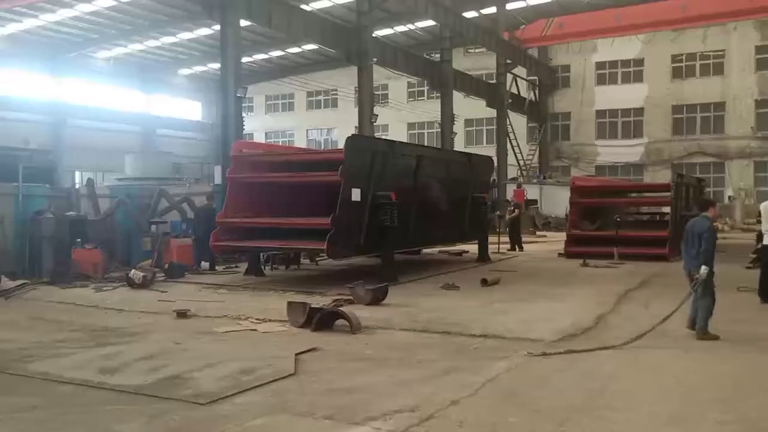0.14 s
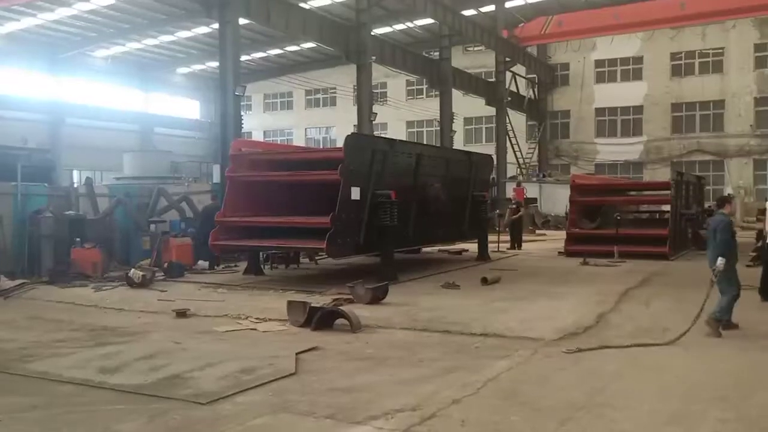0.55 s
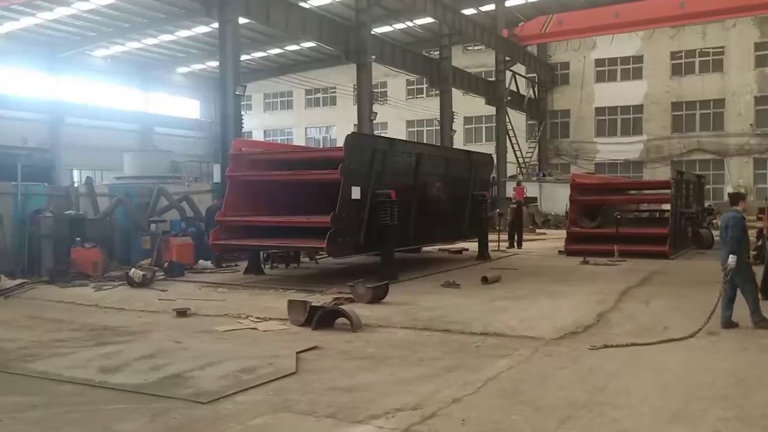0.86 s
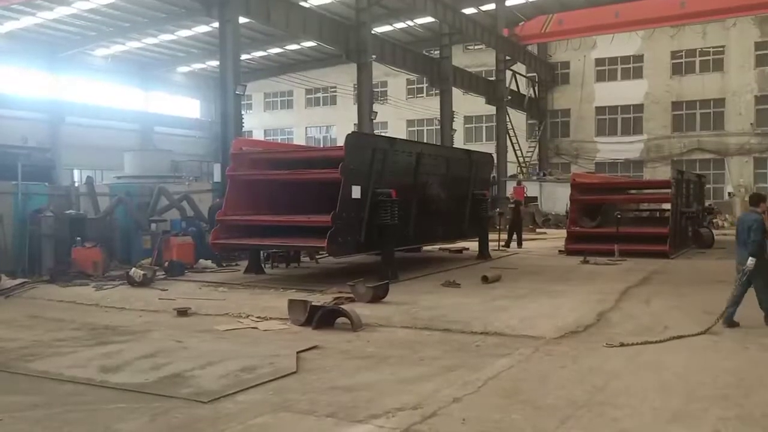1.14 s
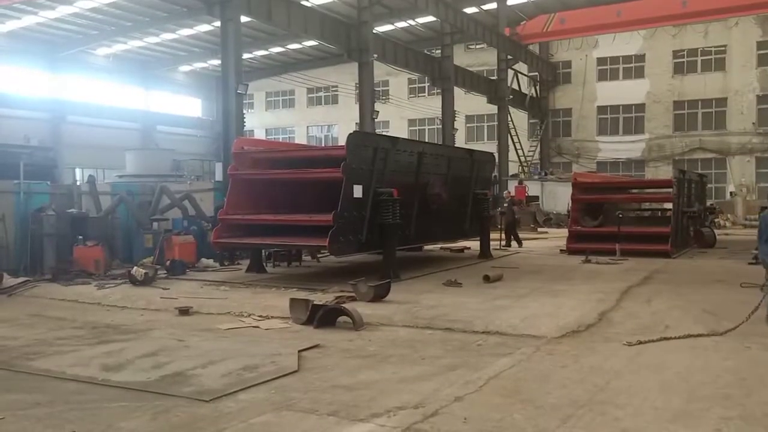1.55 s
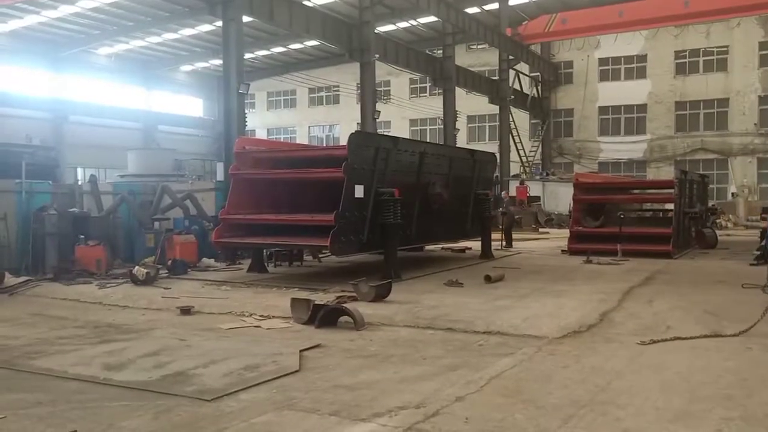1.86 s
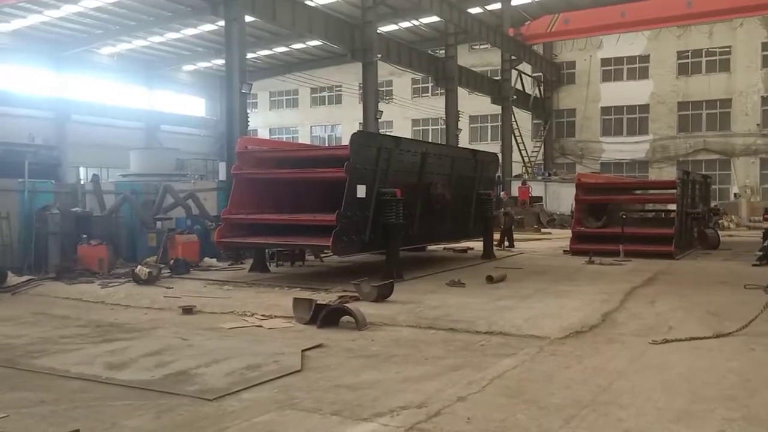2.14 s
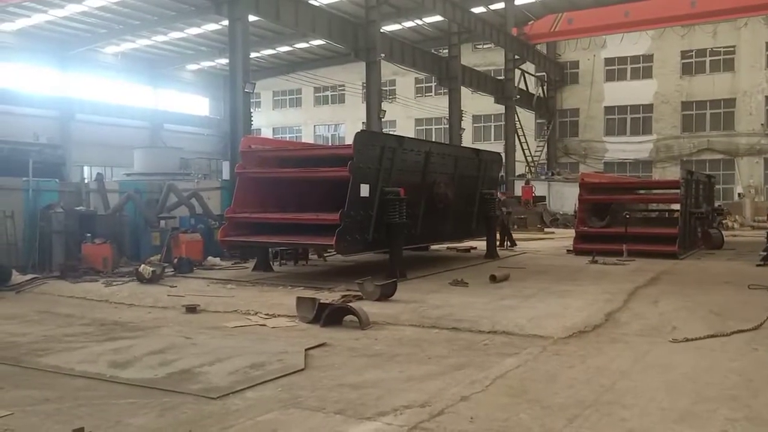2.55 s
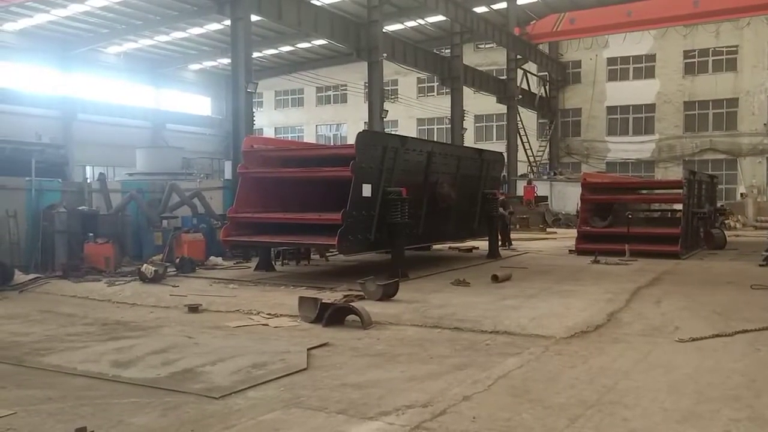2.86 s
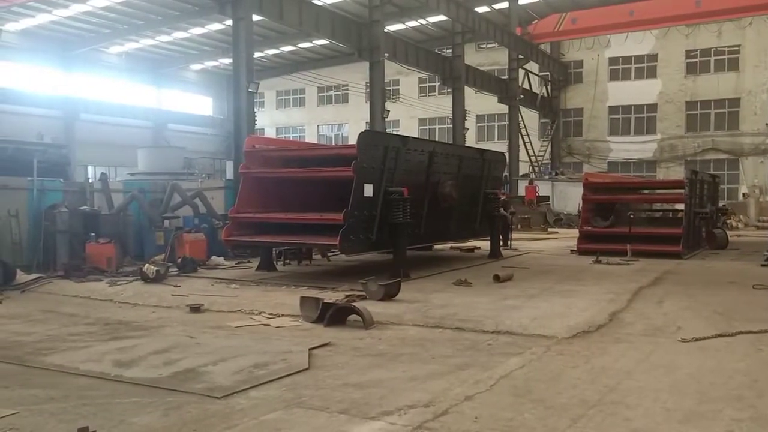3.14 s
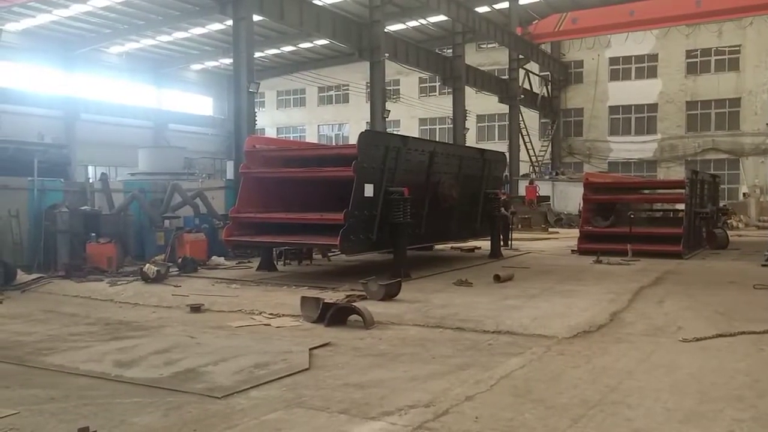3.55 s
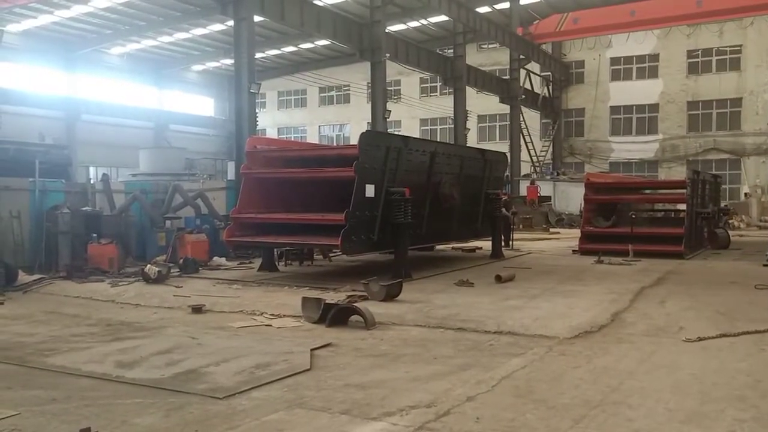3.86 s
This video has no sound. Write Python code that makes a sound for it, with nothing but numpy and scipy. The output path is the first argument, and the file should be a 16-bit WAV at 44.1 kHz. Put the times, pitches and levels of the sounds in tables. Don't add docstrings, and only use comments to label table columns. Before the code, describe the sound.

Large vibrating screen machine thumps and rattles steadily over a roar, distant hammering ringing in the hall

```python
import sys
import numpy as np
from scipy import signal
from scipy.fft import rfft, irfft
from scipy.io import wavfile
from scipy.ndimage import uniform_filter1d

SR = 44100
rng = np.random.default_rng(int(sys.argv[2]) if len(sys.argv) > 2 else 0)


def decibels_to_gain(level_db):
    exponent = np.asarray(level_db, float) / 20
    return 10 ** exponent


def transcribe(u):
    v = np.clip(np.atleast_2d(u).T, -1, 1)
    q = np.round(v * 32767).astype(np.int16)
    wavfile.write(sys.argv[1], SR, q)


N = 176400
SHAFT_HZ = 16.65

# t/s, level/dB, treble level/dB, hardest rung mode f/Hz
HAMMER_BLOWS = [(.02, -33.5, -4, 2300), (.347, -22, 0, 1513), (.69, -25.5, 1, 1910), (.99, -26, -2, 2520),
                (1.255, -24.5, -1.5, 2053), (1.555, -26.5, 2, 2053), (1.84, -26.5, 3, 2420),
                (2.17, -28.5, 3.5, 2283), (2.805, -26, 2.5, 2250), (3.17, -23, 0.5, 2750),
                (3.495, -25.5, 3.5, 2940), (3.805, -25, 1, 2460)]
# f/Hz, level/dB
PLATE_COLOUR = [(700, -7), (1200, -10), (1500, -4.5), (2200, -2.5), (2900, -3.5), (3600, -11),
                (8500, -18.5), (11500, -22.5)]
# f/Hz, level over the plate colour/dB
PLATE_MODES = [(1502, 3), (1653, 0), (1780, 1), (1846, 2), (1935, 1), (2013, 2), (2283, 1), (2471, 2),
               (2632, 0), (2775, 1), (2880, 4), (3135, 1), (4320, 2), (4530, 2)]
# lowest f/Hz, highest f/Hz
STRAY_RANGE = (1350, 3300)
# t/s, level/dB, centre f/Hz
WALL_CLANKS = [(0.414, -35, 3640), (.49, -42, 4640), (.81, -36, 3500), (1.052, -41.5, 4100),
               (1.13, -36, 2200), (1.33, -32, 1700), (1.38, -36.5, 3230), (1.60, -38, 7000),
               (1.996, -38.5, 6500), (2.195, -41.5, 6900), (2.278, -39.5, 4240), (2.39, -39.5, 4460),
               (2.471, -45.5, 5000), (2.55, -38, 1740), (2.901, -40, 4560), (3.261, -39, 3560),
               (3.411, -34, 2700), (3.70, -36, 2720), (3.89, -39, 4170)]
# f/Hz, level/dB
ROAR_COLOUR = [(90, -15.5), (200, -5.5), (450, -13.5), (540, -6.5), (690, -5.5), (860, -10), (1200, -15.5),
               (2200, -11.5)]
# t/s, roar level/dB, level of all shaft orders/dB
DECK_LOAD = [(.3, 0, 1), (.55, -4.5, 1.5), (.8, -1, 1), (1, 0, 0), (1.3, -2, 0), (1.6, -1, -2),
             (1.9, 0.5, 0), (2.2, 1, -1), (2.5, -1.5, -1.5), (2.7, -1, 0), (2.9, 2.5, 1.5), (3.1, 2, 1),
             (3.3, 0.5, 1.5), (3.6, -1, 0), (3.8, 1, 0), (4, -0.5, 0.5)]
# multiple of the shaft rate
# [1], level/dB
SHAFT_ORDERS = [(4, -28), (5, -20), (6, -3), (7, -7), (8, -10), (9, -1), (10, -1), (11, -1), (12, 1),
                (13, 0), (14, -6), (15, -3), (16, -15), (17, -18), (18, -4), (19, -4), (20, -13), (21, -5),
                (22, -6), (23, -9), (24, -6),
                (25, -18), (26, -11), (27, -17), (28, -15), (30, -20), (31, -8), (32, -12), (33, -12),
                 (34, -5), (35, -16), (36, -11), (37, -7), (38, -8), (40, -11), (42, -12), (43, -19),
                 (44, -15), (45, -18), (46, -19), (47, -18), (58, -20), (59, -20)]
# f/Hz, level/dB
MIC_RESPONSE = [(30, -12.5), (55, -16.5), (85, 1), (8800, 1), (9700, -1.5), (10600, -3), (11500, -2)]
# f/Hz, share of the time [0-1]
DROPOUT_SHARE = [(3000, 0), (4000, .015), (7200, .04), (7700, .18), (8600, .22), (9400, .22), (9800, .68),
                 (10300, .74), (10700, .84), (11000, .74), (11300, .36), (11700, .42), (11900, .8)]
# from t/s, to t/s, level above the knee/dB, level below it/dB
TREBLE_SPELLS = [(.27, .36, 3, 2), (.37, .47, -3, -3), (.60, .66, 3, 0), (.79, .93, -1, -3),
                 (.98, 1.02, 5, 2), (1.04, 1.19, -4, -3), (1.22, 1.29, 12, 3), (1.30, 1.47, -1, -3),
                 (1.48, 1.63, 12, 3), (1.63, 2.24, 0, 3), (2.25, 2.40, -4, -3), (2.40, 2.51, -4, 1),
                 (2.52, 2.84, 2, 3), (2.87, 3.09, -6, 2), (3.10, 3.17, 12, 2), (3.43, 3.48, 6, 2),
                 (3.52, 3.71, -5, 1), (3.83, 3.89, -5, -3), (3.90, 3.93, 5, 2), (3.94, 4, -4, -1)]
# f/Hz, share [0-1]
SPELL_REACH = [(6000, .2), (7600, 1), (11000, 1), (11250, .2)]


def colour(x, points):
    hz, db = np.array(points, float).T
    f = np.maximum(np.arange(len(x) // 2 + 1) * SR / len(x), 1)
    gain = decibels_to_gain(np.interp(np.log(f), np.log(hz), db))
    return irfft(rfft(x) * gain, len(x))


def set_rms(x, db):
    return x * decibels_to_gain(db) / np.sqrt(np.mean(x ** 2))


def walk(rate_hz):
    hold = int(SR / rate_hz)
    steps = np.repeat(rng.standard_normal(N // hold + 1), hold)
    return 1.33 * uniform_filter1d(uniform_filter1d(steps, hold), hold)[:N]


def plate_ring(n, struck_hz):
    f = np.arange(n // 2 + 1) * SR / n
    width_hz, struck_db, stray_db, spread_db = 16, 7, 2, 3
    strays = [(hz, stray_db) for hz in rng.uniform(*STRAY_RANGE, size=12)]
    power = 1
    for hz, mode_db in PLATE_MODES + [(struck_hz, struck_db)] + strays:
        height = decibels_to_gain(2 * (mode_db + spread_db * rng.standard_normal()))
        power = power + height / (1 + (2 * (f - hz) / width_hz) ** 2)
    noise = colour(rng.standard_normal(n), PLATE_COLOUR)
    return irfft(rfft(noise) * np.sqrt(power), n)


def hammer():
    n = 2 * SR
    out = np.zeros(N + n)
    t, f = np.arange(n) / SR, np.arange(n // 2 + 1) * SR / n
    rise_s, body_t60_s, treble_t60_s, split_hz = 0.016, 4.26, 2.46, 4000
    upper = 1 / (1 + (split_hz / np.maximum(f, 1)) ** 6)
    swell = 1 - np.exp(-t / rise_s)
    for start, db, treble_db, struck_hz in HAMMER_BLOWS:
        ring = rfft(set_rms(plate_ring(n, struck_hz), db))
        body = irfft(ring * (1 - upper), n) * decibels_to_gain(-60 * t / body_t60_s)
        treble = irfft(ring * upper, n) * decibels_to_gain(treble_db - 60 * t / treble_t60_s)
        i = int(start * SR)
        out[i:i + n] += (body + treble) * swell
    return out[:N] * decibels_to_gain(0.95 * walk(21.9))


def clanks():
    out, t = np.zeros(N + SR), np.arange(SR // 2) / SR
    rise_s, t60_s, skirt_db = 0.0095, 0.37, -11
    envelope = (1 - np.exp(-t / rise_s)) * decibels_to_gain(-60 * t / t60_s) * 2
    for start, db, hz in WALL_CLANKS:
        band = [(hz / 2, skirt_db), (hz / 1.1, 0), (hz * 1.1, 0), (hz * 2, skirt_db), (SR / 2, -40)]
        burst = colour(rng.standard_normal(len(t)), band)
        i = int(start * SR)
        out[i:i + len(t)] += set_rms(burst, db) * envelope
    return out[:N]


def roar(t):
    bass_cut_hz = 100
    points = [(bass_cut_hz / 2, -34)] + ROAR_COLOUR + [(3600, -24), (SR / 2, -60)]
    noise = rfft(colour(rng.standard_normal(N), points))
    octave = np.log2(np.maximum(np.arange(len(noise)) * SR / N, 1) / 30)
    mesh = 0
    for k in range(9):
        overlap = np.cos(np.pi / 2 * np.clip(octave - k, -1, 1)) ** 2
        mesh = mesh + irfft(noise * overlap, N) * decibels_to_gain(1.1 * walk(14))
    hiss = colour(rng.standard_normal(N), [(2500, -29), (4000, -15), (9000, -11)]) * decibels_to_gain(.5 * walk(21))
    load_s, load_db, _ = np.array(DECK_LOAD).T
    return set_rms(mesh, -29) * decibels_to_gain(np.interp(t, load_s, load_db)) + set_rms(hiss, -36.5)


def order_phase(k, hum):
    luck = rng.standard_normal()
    loose_rad = .15
    if hum:
        return .5 - 2 * np.pi * k * .532 + loose_rad * luck
    if k < 16.5:
        return -2.4 - 2 * np.pi * k * .484 + loose_rad * luck
    if k < 23.5:
        return 1.1 - 2 * np.pi * k * .064 + 4 * loose_rad * luck
    return 2 * np.pi * luck


def screen(t):
    thump_top, thump_middle, pole_pairs = 16.5, 11, 3
    load_s, _, load_db = np.array(DECK_LOAD).T
    heave_db = 0.16 * walk(7.8) + np.interp(t, load_s, load_db)
    thump_db, tilt_db = 1.1 * walk(SHAFT_HZ), .7 * walk(SHAFT_HZ)
    out = 0
    for k, order_db in SHAFT_ORDERS:
        hum = k < thump_top and k % pole_pairs == 0
        start = order_phase(k, hum)
        sway = np.sqrt(k) * .06 * walk(6.1)
        db = -37 + order_db + heave_db + 1.3 * min(k / thump_top, 1) * walk(9)
        if k < thump_top and not hum:
            db = db + thump_db + tilt_db * (k - thump_middle)
        out = out + decibels_to_gain(db) * np.sqrt(2) * np.cos(2 * np.pi * k * SHAFT_HZ * t + start + sway)
    return out


def scene():
    t = np.arange(N) / SR
    return (hammer() + clanks() + roar(t) + screen(t))[None]


def thin_treble(x, size=2048, count=8):
    window = np.sin(np.pi * (np.arange(size) + .5) / size)
    f, t, z = signal.stft(x, SR, window, size, size // 2)
    bands = z[:-1].reshape(-1, count, z.shape[1])
    db = 10 * np.log10(np.mean(abs(bands) ** 2, axis=1) + 1e-14)
    luck = rng.standard_normal(db.shape)
    luck = uniform_filter1d(uniform_filter1d(luck, size=2, axis=0), size=2, axis=1)
    margin = db - db.mean(axis=0) + 2 * 3.2 * luck
    hz = f[count // 2::count][:len(db)]
    reach = np.interp(hz, *np.array(SPELL_REACH).T)
    knee_hz = 9450
    for start, end, above_db, below_db in TREBLE_SPELLS:
        spare_db = np.where(hz > knee_hz, above_db, below_db) * reach
        margin = margin + np.outer(spare_db, (t >= start) & (t < end))
    share = np.interp(hz, *np.array(DROPOUT_SHARE).T)
    limit = np.array([np.quantile(row, s) for row, s in zip(margin, share)])
    bands = bands * (margin >= limit[:, None])[:, None]
    thinned = np.vstack([bands.reshape(-1, z.shape[1]), z[-1:]])
    return signal.istft(thinned, SR, window, size, size // 2)[1][:N]


def band_limit(x):
    return signal.sosfilt(signal.butter(12, 11940, fs=SR, output="sos"), x)


def record(dry):
    fade_start_s, fade_s, fade_bend = .1575, 0.31, 0.76
    fade = np.clip((np.arange(N) / SR - fade_start_s) / fade_s, 0, 1) ** fade_bend
    heard = thin_treble(colour(dry[0], MIC_RESPONSE))
    return band_limit(heard[None] * fade)


dry = scene()
out = record(dry)
transcribe(out)
```